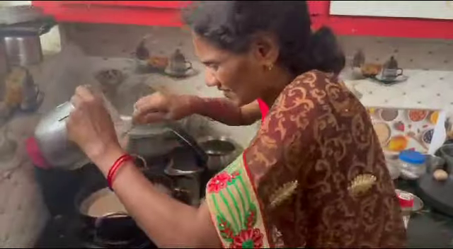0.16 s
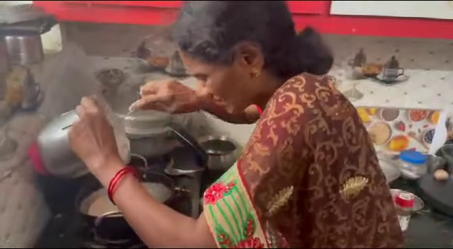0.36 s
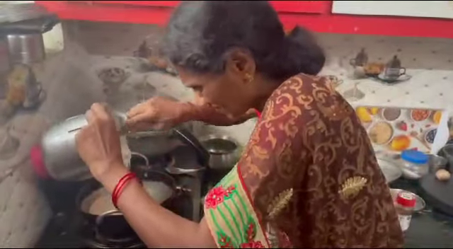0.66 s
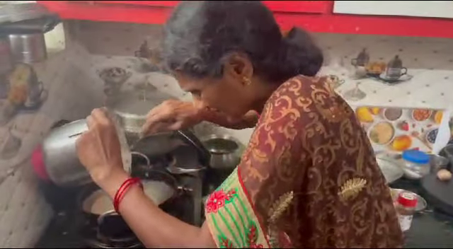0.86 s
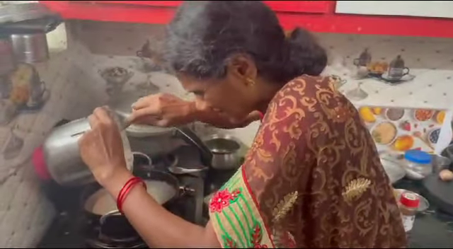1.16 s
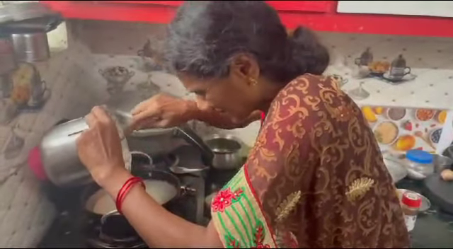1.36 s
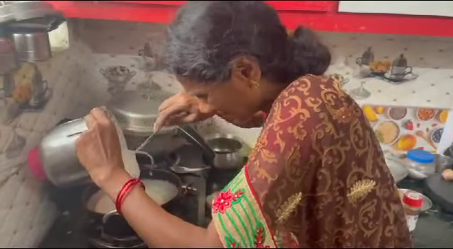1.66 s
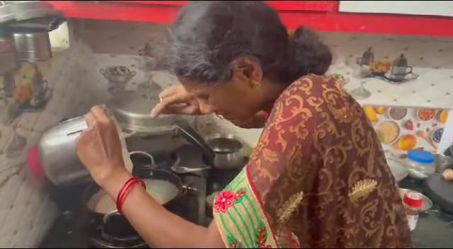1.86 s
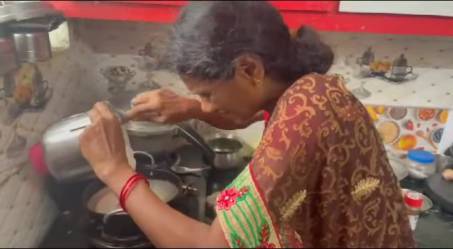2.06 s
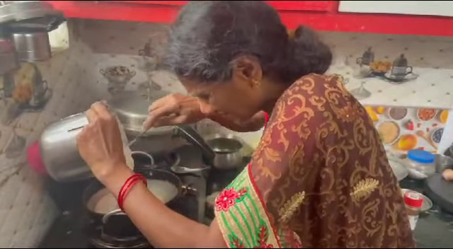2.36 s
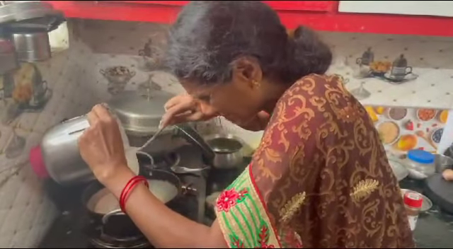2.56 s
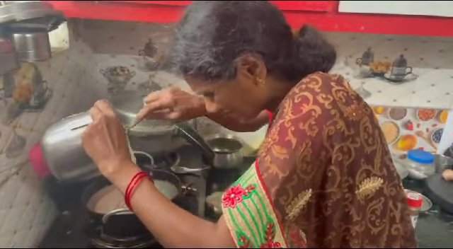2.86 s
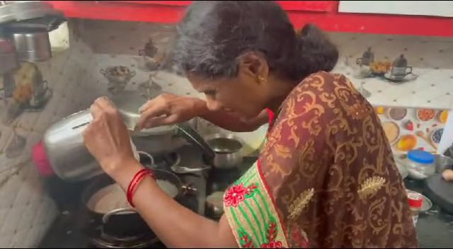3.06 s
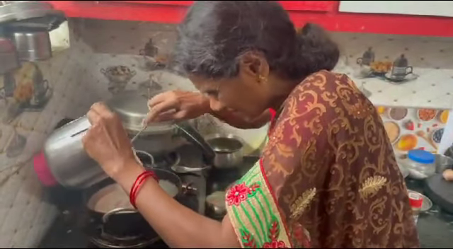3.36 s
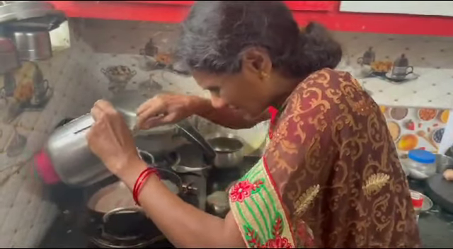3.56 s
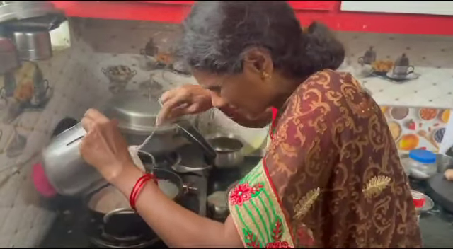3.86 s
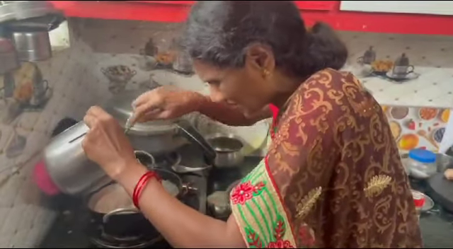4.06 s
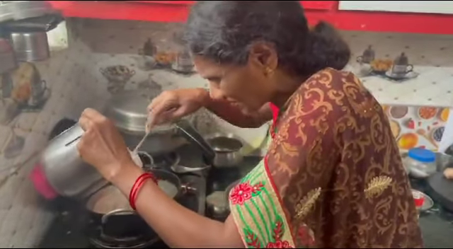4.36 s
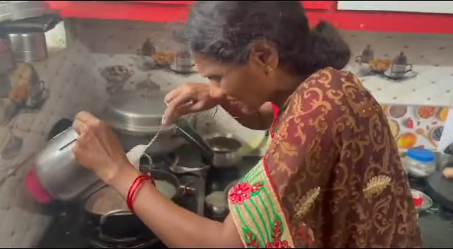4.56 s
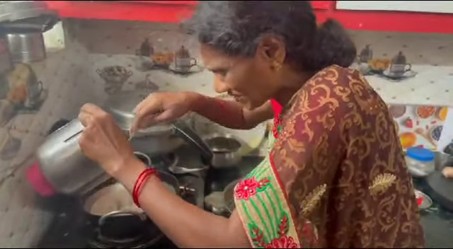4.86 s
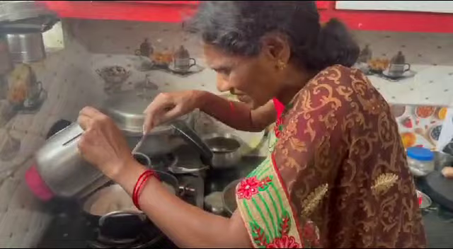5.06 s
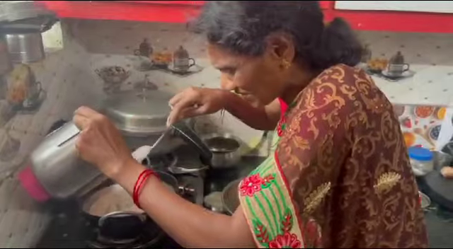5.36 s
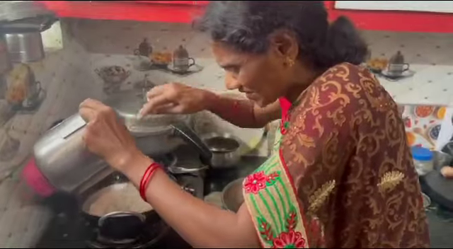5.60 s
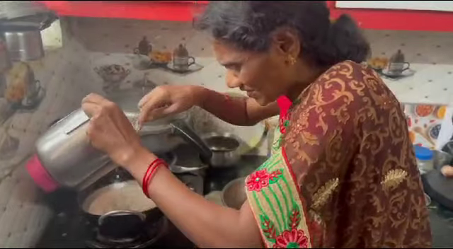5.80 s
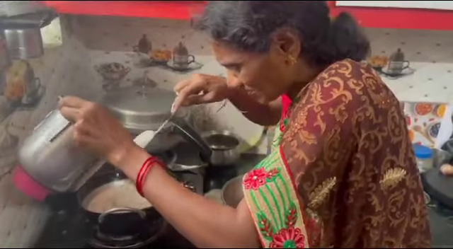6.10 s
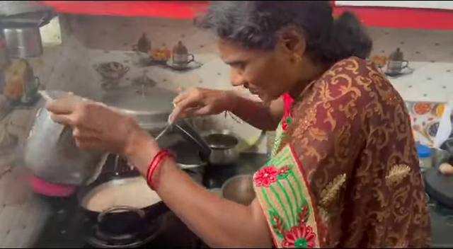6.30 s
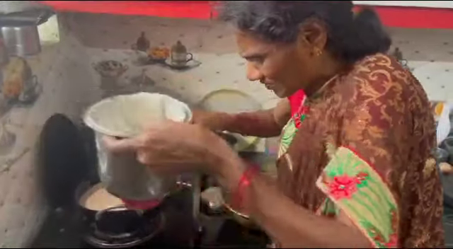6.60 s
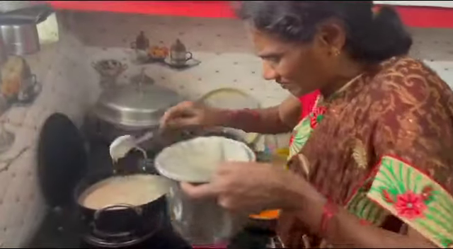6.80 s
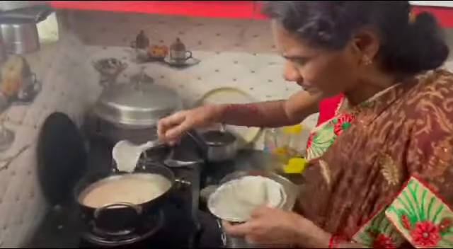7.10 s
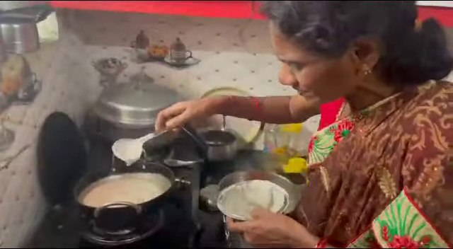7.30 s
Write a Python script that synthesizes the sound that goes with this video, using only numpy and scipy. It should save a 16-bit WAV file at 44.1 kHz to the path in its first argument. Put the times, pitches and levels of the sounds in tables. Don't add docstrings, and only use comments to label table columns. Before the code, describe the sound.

Close in a small kitchen, a ladle knocks and strokes inside a dented steel jar, dulled by thick batter and a gripping hand. A pan hisses steadily with tiny spits, growing stronger as batter spreads. Scrapes and a short rim rattle come late, then the jar thuds and bounces on the counter, the loudest sound. Low burner rumble throughout; stereo phone at arm's length.

```python
import sys
import numpy as np
from scipy import signal
from scipy.fft import rfft, irfft
from scipy.io import wavfile
from scipy.ndimage import uniform_filter1d

SR = 44100
rng = np.random.default_rng(int(sys.argv[2]) if len(sys.argv) > 2 else 0)


def rack_gain(trim_db):
    fader = np.asarray(trim_db, float)
    return 10 ** (fader / 20)


def store_wav(level_fs):
    pcm = np.round(np.clip(np.atleast_2d(level_fs), -1, 1) * 32767)
    wavfile.write(sys.argv[1], SR, pcm.T.astype(np.int16))


N = 328104

# (frequency [Hz], left minus right [dB], likeness [0-1], phase of right [rad])
PORT_PAIR = [(39.7, 0.5, 0.97, 0.17), (150, 6, 0.74, 0.21), (348, 1.5, 0.67, 0.25), (630, 5, 0.53, 1.5),
             (2060, 0, 0.13, -2.5), (3320, 0.5, 0.33, -2.5), (4420, 6, 0.28, 0), (5450, 5, 0, 3),
             (6500, 6, 0.14, -1.5), (7600, 8.5, 0.3, 6), (8350, 7, 0.8, 0), (9080, -3, 1, 3.5),
             (9380, 1, 0.97, 4), (11900, .3, 0, 4)]


def evened(x):
    return x / np.sqrt(np.mean(x ** 2) + 1e-20)


def read(points, at, column=1, log=True):
    table = np.array(points, float)
    bend = np.log1p if log else np.asarray
    return np.interp(bend(at), bend(table[:, 0]), table[:, column])


def add(mix, s, sound):
    part = mix[round(s * SR):][:len(sound)]
    part += sound[:len(part)]


def drift(shape, width, length):
    noise = rng.standard_normal(shape[::-1]).T
    across = uniform_filter1d(noise, width, 0)
    return evened(uniform_filter1d(across, length, 1))


def waver(s, length):
    return drift((1, len(s)), width=1, length=length)


def bump(hz, centre_hz, width):
    return 1 / (1 + (2 * (hz - centre_hz) / width) ** 2)


def field(level_db, size):
    frames = 4 * N // size + 8
    hz = np.fft.rfftfreq(size, 1 / SR)
    a, b, c, d = rng.standard_normal((frames, len(hz), 4)).T
    shared, own = a + 1j * b, c + 1j * d
    balance_db, like, phase = (read(PORT_PAIR, hz, column=k)[:, None] for k in range(1, 4))
    like = np.clip(like, 0, 1)
    right = like * np.exp(1j * phase) * shared + np.sqrt(1 - like ** 2) * own
    s = np.arange(frames) * size / 4 / SR
    z = np.array([shared, right / rack_gain(balance_db)]) * rack_gain(level_db(hz[:, None], s))
    return signal.istft(z, nperseg=size, noverlap=size - size // 4)[1][:, :N]


def crack(hz, decay_s, spread):
    burst = rng.standard_normal(2000) * np.exp(-np.arange(2000) / SR / decay_s)
    edges_hz = [hz / (1 + spread), min(hz * (1 + spread), 11500)]
    out = signal.lfilter(*signal.butter(2, edges_hz, "band", fs=SR), burst)
    return out / abs(out).max()


def ring(modes, tilt_db, damping, rise_s):
    t = np.arange(8000) / SR
    hz, width, db = np.repeat(modes, 3, axis=0).T
    shift, phase = rng.uniform(0.5, 1, (len(hz), 2)).T
    side = np.tile([0, -1, 1], len(modes))
    stray_db = -6.0 * abs(side)
    level = rack_gain(db + tilt_db * np.log2(hz / hz.mean()) + stray_db)[:, None]
    dying = np.exp(-np.pi * np.outer(width * damping, t))
    rising = 1 - np.exp(-np.outer(hz / 1000, t / rise_s))
    stray_hz = 1.49 * width * shift * side
    turns = np.outer(hz + stray_hz, t) + 2 * phase[:, None]
    out = (level * rising * dying * np.sin(2 * np.pi * turns)).sum(0)
    return out / np.sqrt(2 * np.mean(out[:300] ** 2))


def blows(rows, modes, damping):
    out = np.zeros(N)
    for s, db, tilt_db, tick_db in rows:
        add(out, s, rack_gain(db - 5.0) * ring(modes, tilt_db, damping, rise_s=0.00078))
        add(out, s - .001, rack_gain(db + tick_db) * crack(3900, decay_s=0.012, spread=1.0))
    return out


def rumble():
    # (frequency [Hz], density [dB per Hz])
    air = [(15, -62), (25, 2.5), (91, -11), (147, 3), (196, -7.5), (401, -10.5), (674, -18), (900, -17),
           (1180, -21), (1730, -21), (1950, -25.5), (2100, -16), (2500, -45), (3250, -60), (5500, -120)]
    # (frequency [Hz], width [Hz], level [dB])
    hums = [(55, 15, -58), (141.7, 16.5, -52)]

    def air_db(hz, s):
        patches = 1.3 * drift((len(hz), len(s)), width=8, length=8)
        return read(air, hz) + patches - 60 * (hz > 2500)

    def hum_db(hz, s):
        power = sum(rack_gain(2 * db) * bump(hz, f, w) ** 2 / w for f, w, db in hums)
        return 10 * np.log10(power) + 0 * s

    return rack_gain(-52.5) * evened(field(air_db, size=2048)) + rack_gain(5.5) * field(hum_db, size=4096)


def pan_hiss():
    # (time [s], level [dB])
    simmer = [(0.0, -52.5), (1.1, -52.5), (2.8, -54), (4.4, -54.5), (4.9, -50), (5.4, -51.5), (5.95, -46.5),
              (6.5, -48), (6.7, -44), (7.15, -48.5), (7.44, -47.5)]
    # (frequency [Hz], density [dB per Hz])
    colour = [(700, -10), (1500, -6), (2600, -2), (3400, 0), (4200, 0.5), (5000, 6), (6000, 6.5),
              (7000, 5.5), (7600, 0.5), (8200, 5.5), (9000, 1.5), (10400, 6), (11300, 4), (12000, -12)]
    # frequency [Hz], width [Hz], depth [dB]
    notch_hz, notch_width, notch_db = (5554, 146, -20)

    def level_db(hz, s):
        simmer_db = read(simmer, s, log=False)
        throb = 1.2 * waver(s, 9) + 0.41 * waver(s, 2)
        patches = 1.98 * drift((len(hz), len(s)), width=9, length=12)
        patches = patches + 1.05 * drift((len(hz), len(s)), width=4, length=50)
        tilt_db = -0.7 + 0.07 * (simmer_db + 53) + 0.6 * waver(s, 60)
        tilt = tilt_db * np.log2((hz + 500) / 6000)
        notch = notch_db * np.exp(-((hz - notch_hz) / notch_width) ** 2)
        return read(colour, hz) + notch + simmer_db + tilt + throb + patches - 60 * (hz < 500)

    return rack_gain(-17.0) * field(level_db, size=512)


def spits():
    # (time [s], peak level [dB], pitch [Hz])
    large = [(.0463, -31.5, 5900), (1.5676, -34.5, 6000), (1.891, -35, 5980), (2.446, -41, 6100),
             (3.17, -33.5, 6550), (4.4089, -36, 6800), (4.4468, -38, 6160), (5.5288, -34, 4840),
             (7.0668, -31, 4460), (7.2365, -31, 6000), (7.3143, -35, 6060)]
    out = np.zeros(N)
    for s, db, hz in large:
        add(out, s, rack_gain(db - 0.5) * crack(hz, decay_s=0.0054, spread=0.41))
    for when, size, pitch in rng.random((18, 3)):
        small = crack(6000 * (.85 + .3 * pitch), decay_s=0.003, spread=0.3)
        add(out, when * N / SR, rack_gain(-43 + 6.0 * size) * small)
    return out


def drag():
    # (middle [s], length [s], level [dB])
    strokes = [(.35, 0.78, -55), (1.65, 0.57, -54), (2.3, 0.9, -51), (3.2, 2.4, -62), (4.48, 0.43, -50.5),
               (4.852, 0.28, -46), (5.064, 0.24, -44.5), (5.28, 0.28, -45), (5.9, 0.64, -50)]
    # (frequency [Hz], width [Hz], level [dB])
    low_modes = [(295, 40, -4.5), (403, 50, -2.5), (545, 30, -3.5)]

    def level_db(hz, s):
        body = sum(rack_gain(2 * db) * bump(hz, f, w) ** 2 for f, w, db in low_modes)
        push = 0
        for mid, length, db in strokes:
            edge_db = -12.5 * (2 * (s - mid) / length) ** 2
            push = push + rack_gain(2 * (db + edge_db))
        return 10 * np.log10(body) + 10 * np.log10(push + 1e-12) + 2.5 * waver(s, 3)

    return rack_gain(-4.0) * field(level_db, size=1024)


def snaps():
    # (time [s], peak level [dB], pitch [Hz])
    contacts = [(0.0948, -28, 4040), (0.3353, -36, 3600), (1.4835, -31.5, 4900), (2.0983, -33, 4250),
                (4.069, -34.5, 4300), (5.3383, -31, 4440), (5.3971, -29.5, 5500), (5.5777, -38, 3950),
                (7.344, -17.5, 3600)]
    out = np.zeros(N)
    for s, db, hz in contacts:
        add(out, s, rack_gain(db - 0.5) * crack(hz, decay_s=0.0054, spread=0.41))
    return out


def handle_clinks():
    # (time [s], peak level [dB], pitch [Hz])
    clinks = [(1.4842, -28.5, 5010), (5.338, -41, 4440), (5.3987, -33.5, 5050)]
    # (frequency [Hz], width [Hz], level [dB])
    handle = [(4440, 74, -2.5), (4460, 92, -14), (5010, 64, 4.5), (5670, 95, -11), (6160, 84, 0),
              (7010, 130, 2), (8000, 120, -25)]
    out = np.zeros(N)
    for s, db, hz in clinks:
        modes = [(f * hz / 5030, w, d) for f, w, d in handle]
        add(out, s, rack_gain(db - 5.5) * ring(modes, 0, damping=0.52, rise_s=0.0016))
        add(out, s, rack_gain(db - 10.0) * crack(1.8 * hz, decay_s=0.0046, spread=0.77))
    return out


def jar_knocks():
    # (time [s], peak level [dB], brightness [dB per octave], tick [dB])
    rim_blows = [(.098, -21, -2.5, -12.5), (.104, -24.5, -0.5, -11), (.130, -37, -5, 3.5),
                 (.164, -40, -4, -12), (.335, -27, 6.5, -6), (.346, -35, -4.5, -15), (.405, -36.5, -4, -14),
                 (.501, -36.5, -6, -8), (.644, -38, 9.5, -8)]
    side_blows = [(2.097, -22, 2.5, -19), (2.108, -31, -5, -24), (2.135, -32, -1.5, -13),
                  (2.155, -31, -0.5, -7), (2.19, -37.5, -.8, -2), (3.172, -45.5, 3, 2),
                  (1.211, -35.5, 17, -3)]
    wall_blows = [(4.026, -32.5, 1.1, -6), (4.734, -26, 1.1, -9), (4.745, -27, 0.73, -27)]
    scraped_blows = [(5.343, -44.5, 1.3, 8), (5.581, -23.5, 2.3, -21), (5.591, -28, 2.3, -18)]
    lip_rattle = [(5.95, -44, 4.5, -3), (5.963, -36, 4.5, -8), (5.977, -32.5, 3.5, -7),
                  (5.988, -32, 3.5, -5), (5.997, -28, -2.5, -14), (6.012, -36, 2.5, -2),
                  (6.034, -42, -3, -9)]
    base_blows = [(1.212, -30.5, .1, -12), (1.234, -30, .1, -14), (1.244, -37.5, .1, -20),
                  (2.83, -37, .1, -9), (2.845, -42, .1, -8), (4.043, -31.5, .1, -17), (4.444, -47, .1, 4)]
    # (frequency [Hz], width [Hz], level [dB])
    rim = [(223, 42, -10.5), (443, 43, -6.5), (635, 40, -10.5), (750, 58, -1), (888, 56, -0.5),
           (1150, 28, -15), (1440, 58, -7.5), (1766, 71, 0.5), (2050, 44, -29), (2530, 120, -9),
           (2860, 80, -26), (3470, 73, -14)]
    side = [(234, 54, -2), (412, 26, -10), (587, 43, -5.5), (674, 45, -7), (864, 60, -3.5),
            (1040, 140, -0.5), (1150, 76, -16), (1563, 77, -1), (1753, 73, -0.5), (2060, 46, -4.5),
            (2320, 47, -8), (2540, 43, -14.5)]
    wall = [(207, 31, -7.5), (409, 28, -1.5), (538, 8, -3), (644, 49, -5), (844, 91, 1), (982, 92, 0.5),
            (1267, 35, -9.5), (1630, 30, -13), (1790, 48, -24), (1996, 42, -13.5), (2570, 150, -18.5),
            (2930, 59, -19)]
    lip = [(407, 48, -6.5), (544, 17, -2.5), (880, 87, -0.5), (1223, 64, -12), (1570, 25, -14.5),
           (1825, 37, -16.5), (2210, 26, -16), (2560, 40, -20), (2900, 48, -19), (4160, 61, -13)]
    base = [(293, 67, -1), (440, 78, -3.5), (600, 43, 2), (854, 50, -10.5), (1170, 70, -15),
            (1604, 27, -15), (1755, 47, -17), (2110, 77, -11), (2350, 67, -14)]
    out = blows(rim_blows, rim, damping=1.55)
    out += blows(side_blows, side, damping=1.15)
    out += blows(wall_blows, wall, damping=.91)
    out += blows(scraped_blows, wall, damping=1.36)
    out += blows(lip_rattle, lip, damping=.9)
    return out + blows(base_blows, base, damping=1.3)


def set_down():
    # (time [s], peak level [dB], brightness [dB per octave], tick [dB])
    landings = [(7.324, -32.5, 7.5, 0), (7.338, -23, 2.5, -12), (7.344, -15, 2.5, -17),
                (7.351, -10.5, -1.2, -22), (7.375, -23.5, -1, -4), (7.392, -20, 0.2, -26),
                (7.418, -28, 1.5, -20)]
    # (frequency [Hz], width [Hz], level [dB])
    counter = [(164, 38, -6.5), (291, 66, -0.5), (482, 65, 0), (600, 74, 2), (730, 70, -10),
               (910, 31, -10.5), (1224, 56, -10.5), (1740, 100, -13), (2080, 58, -15.5), (2520, 70, -11),
               (2940, 110, -6.5), (3500, 150, -13), (4440, 190, -24)]
    return blows(landings, counter, damping=.85)


def kitchen(x):
    # (frequency [Hz], time to fall 60 dB [s])
    t60 = [(200, 0.2), (800, 0.37), (3000, 0.19), (8000, 0.055)]
    taps = np.zeros((2, SR // 2))
    at = np.arange(120, SR // 2 - 20, 20) + rng.integers(0, 20, (2, (SR // 2 - 121) // 20))
    np.put_along_axis(taps, at, rng.choice([-1., 1.], at.shape), 1)
    hz, t, z = signal.stft(taps, SR, nperseg=256)
    dying = rack_gain(-60 * t / read(t60, hz)[:, None])
    tail = signal.istft(z * dying, SR, nperseg=256)[1]
    return signal.fftconvolve(x[None], tail / np.linalg.norm(tail[0]), axes=1)[:, :N]


def ports(x):
    hz = np.fft.rfftfreq(N, 1 / SR)
    right = np.exp(1j * 0.89 * read(PORT_PAIR, hz, column=3)) / rack_gain(read(PORT_PAIR, hz))
    return rack_gain(0.5) * np.array([x, irfft(rfft(x) * right, N)])


def scene():
    near = spits() + snaps() + handle_clinks() + jar_knocks() + set_down()
    echoes = rack_gain([[-4.5], [-7.5]]) * kitchen(near)
    return rumble() + pan_hiss() + drag() + echoes + ports(near)


def top_cut(x):
    return signal.sosfilt(signal.butter(12, 11800, fs=SR, output="sos"), x)


def record(dry):
    low_cut = signal.butter(4, 38, "high", fs=SR, output="sos")
    ceiling = .5
    mix = ceiling * np.tanh(signal.sosfilt(low_cut, dry) / ceiling)
    return top_cut(mix)


dry = scene()
out = record(dry)
store_wav(out)
```